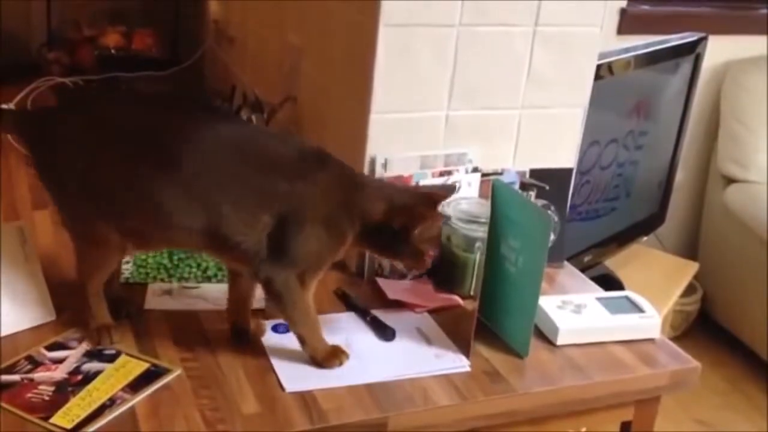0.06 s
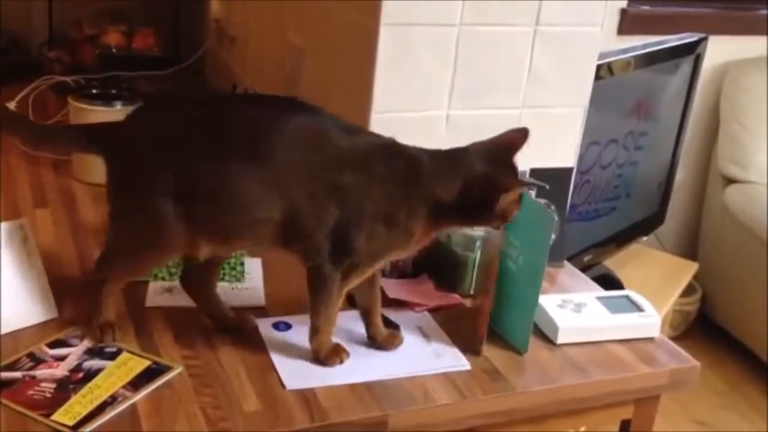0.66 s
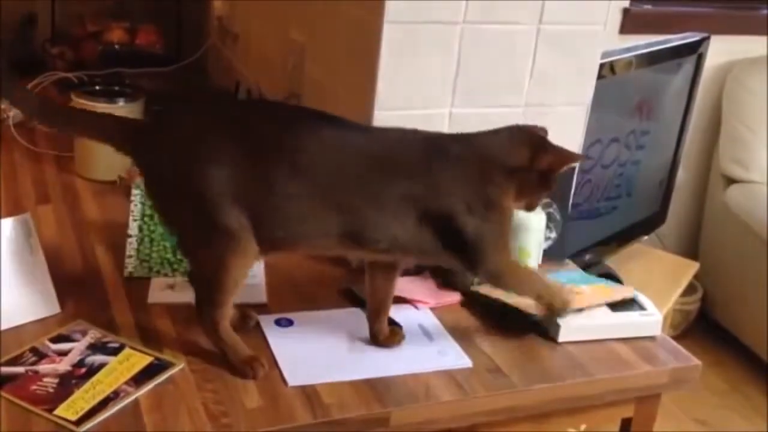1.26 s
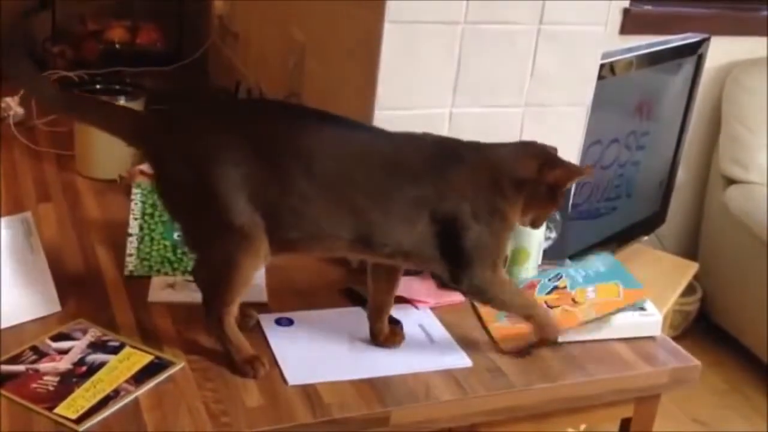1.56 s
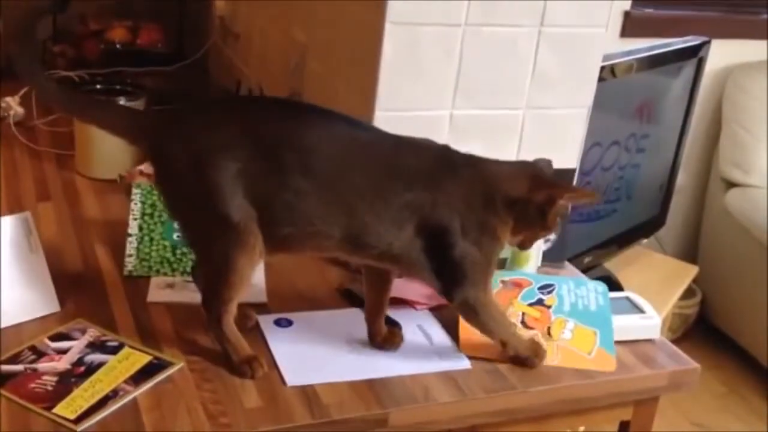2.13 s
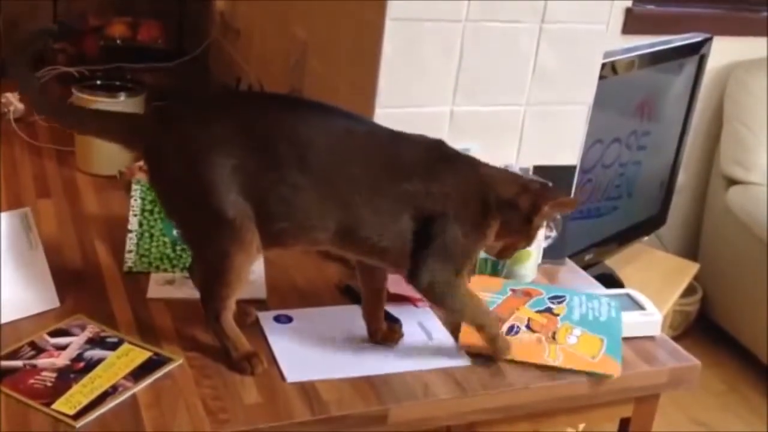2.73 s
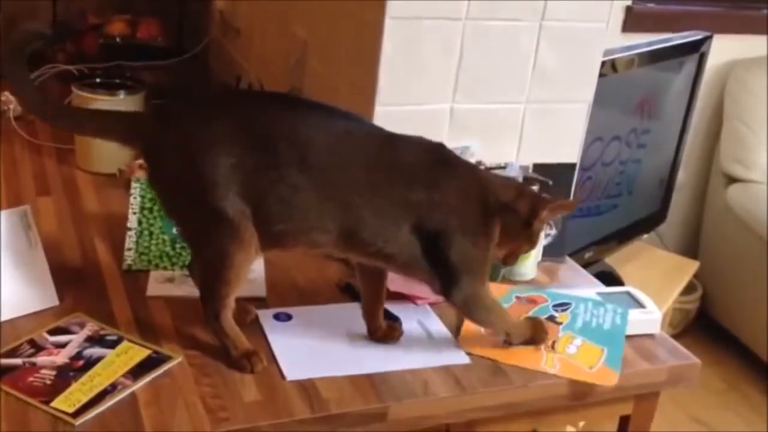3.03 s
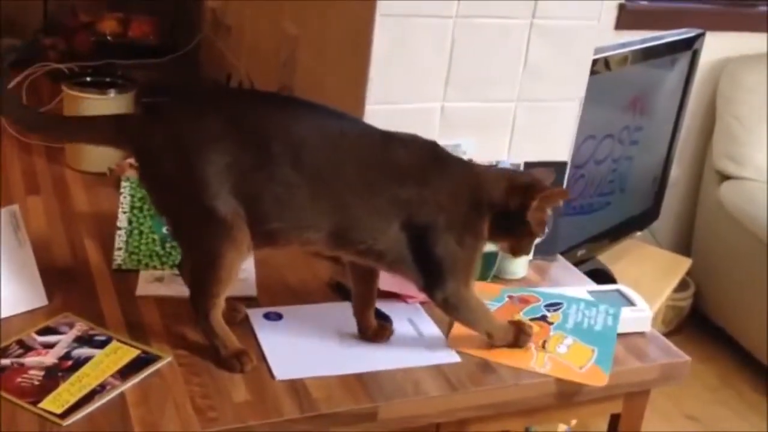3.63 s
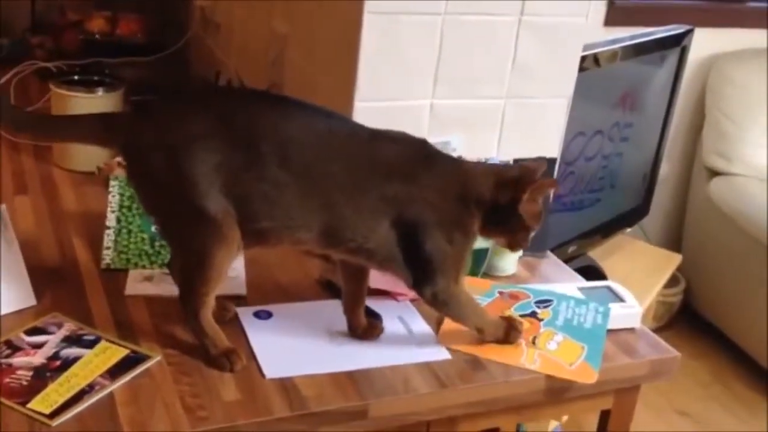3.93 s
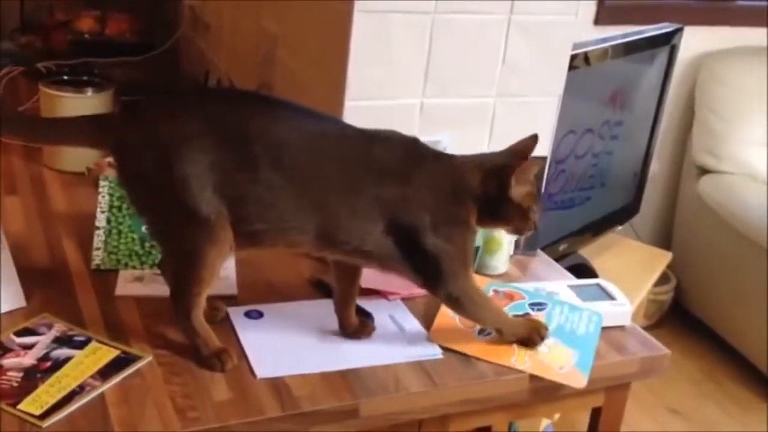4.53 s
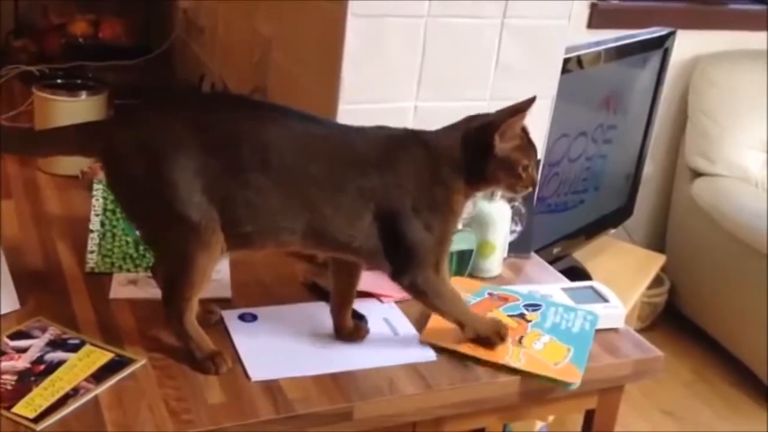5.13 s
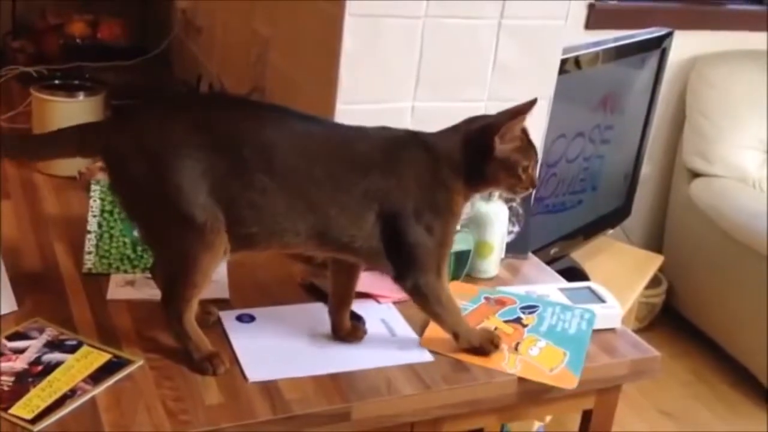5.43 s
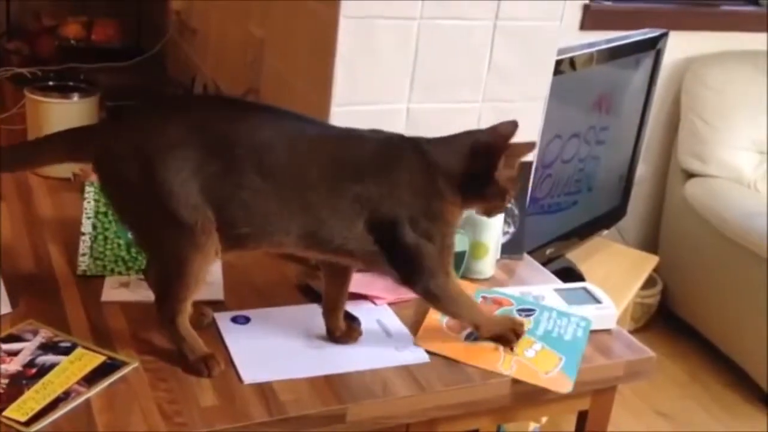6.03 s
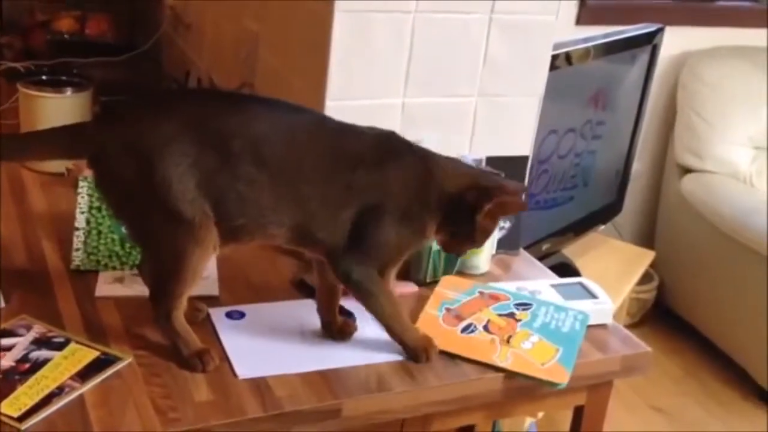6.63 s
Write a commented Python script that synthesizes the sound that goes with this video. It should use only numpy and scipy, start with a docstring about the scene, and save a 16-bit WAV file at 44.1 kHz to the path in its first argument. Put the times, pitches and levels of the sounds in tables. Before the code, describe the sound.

Stiff card clatters over, then snaps and scrapes in short bursts as a cat paws it across a table indoors.

```python
"""A stiff greeting card, tipped over by a cat, slaps onto a plastic box and is dragged about a wooden table.
Each impact gives a broadband crack and excites the damped modes of card or box; claws snag and flick
the edge, which twangs. Each push is a swell of stick-slip friction, filtered by the card's resonances.
Paws thud softly in the table's low modes. The small living room reverberates, and an appliance hums."""
import sys
import numpy as np
from scipy import signal
from scipy.fft import rfft, irfft
from scipy.io import wavfile

SR = 44100
rng = np.random.default_rng(int(sys.argv[2]) if len(sys.argv) > 2 else 0)


def unload_wav(signal):
    """Save mono or channel-first audio to the path in sys.argv[1] as 16-bit WAV at rate SR, clipped to [-1, 1]."""
    wavfile.write(
        sys.argv[1],
        SR,
        np.round(np.clip(np.atleast_2d(signal).T, -1, 1) * 32767).astype(np.int16),
    )


N = 303408
TIME = np.arange(N) / SR
TAIL = TIME[:SR // 2]   # time axis of one impact

# Levels are relative within a column; the functions add the gain of each layer and band.
# card strikes box: t/s, level/dB, bass/dB, treble/dB, contact decay/s, lid clack/dB, reverberation/dB,
# edge twang/dB
BOX_IMPACTS = [(1.309, -25.5, -24.5, -18.5, 0.0026, -5, 1.5, 10),
               (1.3659, -18.5, -30.5, -11, 0.0015, 17, -0.5, 4),
               (1.436, -33, -19.5, -17, 0.0035, 15.5, 3.5, 2)]
# claw flicks card: t/s, level/dB, bass/dB, treble/dB, catch interval/s, change per catch/dB, flexural f/Hz,
# after-ring/dB, edge f/Hz, edge twang/dB, claw tick/dB, reverberation/dB
CLAW_FLICKS = [(1.7082, -39, -22, -4, 0.0045, -4.5, 1940, 17, 3520, 14.5, 17, 4),
               (1.882, -40.5, -15.5, -5, 0.0094, -1, 1980, 16, 3770, 11, 4, 4.5),
               (1.9058, -35, -19, -9.5, 0.0052, -5.5, 2250, 11, 3700, 13, 6.5, -0.5),
               (2.474, -37.5, -20, -4, 0.0044, -12, 1580, 19, 4000, 11, 8, -2.5),
               (3.0637, -29.5, -33, -8.5, 0.0059, -1, 2140, 21, 3195, -6, 1.5, -0.5),
               (4.4878, -32.5, -34, -11.5, .005, 2, 2140, 16, 3100, 6.5, -0.5, 0),
               (5.353, -36, -27, -6, 0.0073, -1.5, 2210, 15.5, 3440, 6, -1, -1),
               (6.208, -30, -28, -8.5, .0019, -0.6, 2400, 19.5, 3153, 11.5, -3, -1)]
# card flops on table: t/s, level/dB, bass/dB, treble/dB, flexural f/Hz, claw tick/dB
CARD_DROPS = [(2.52, -39, -16, -10, 1530, 10), (2.5385, -40, -4.5, -8, 1510, 15),
              (2.5465, -39, -17.5, -4.5, 1590, 2), (3.093, -33, -16.5, -6, 1280, 8),
              (4.509, -34, -21, -9.5, 2200, -6), (5.371, -43.5, -10.5, -6, 2400, 3),
              (5.387, -38.5, -18.5, -6.5, 2160, 2)]
# card slides: t/s, duration/s, share spent accelerating, rub/dB, edge hiss/dB, first f/Hz, last f/Hz
PUSHES = [(0.816, 0.17, 0.22, -64.5, -61, 1800, 1900), (1.158, 0.12, 0.57, -65.5, -59, 1650, 1650),
          (1.262, 0.042, 0.38, -55.5, -57, 1850, 1850), (1.795, 0.16, 0.69, -55, -46, 2030, 1950),
          (2.177, 0.22, 0.26, -52, -51.5, 1150, 1830), (2.241, .045, 0.44, -46.5, -65, 1400, 1550),
          (2.471, 0.077, 0.73, -41.5, -40, 1640, 1490), (2.661, 0.12, .6, -47.5, -51, 1180, 1520),
          (2.758, 0.16, 0.3, -45, -45, 1560, 2350), (3.311, 0.093, 0.42, -50, -51, 1230, 1400),
          (3.44, 0.45, 0.45, -69.5, -95, 1740, 1800), (4.138, .1, 0.54, -52, -54.5, 1510, 1460),
          (4.336, 0.16, .6, -70.5, -65, 1800, 1800), (4.777, 0.15, 0.53, -51, -56.5, 1510, 1450),
          (4.883, 0.12, 0.39, -48.5, -50.5, 1360, 1420), (4.958, 0.23, 0.19, -51.5, -48.5, 1660, 1650),
          (5.499, 0.18, 0.38, -62, -73, 1800, 1810), (5.682, 0.12, 0.38, -58, -61, 1670, 1770),
          (5.82, 0.17, 0.51, -59.5, -62.5, 1760, 1820), (6.423, 0.21, 0.29, -66, -66.5, 1690, 1690),
          (6.813, 0.051, 0.3, -61.5, -54, 1840, 1780)]
# paw pats card: t/s, level/dB, treble/dB, flexural f/Hz
PAW_PATS = [(2.006, -48, -23, 1000), (2.105, -36.5, -24, 1990), (3.224, -47.5, -31, 1360),
            (3.469, -52, -35, 1400), (3.818, -47, -22, 1500), (3.966, -48, -41, 1330),
            (4.041, -50, -40, 1350), (5.201, -58.5, -2.5, 2040)]
# paw lands on table: t/s, level/dB, hardness/(dB per octave)
PAW_STEPS = [(1.512, -60, 0), (2.94, -62.5, -5), (5.855, -61.5, -4), (6.852, -56.5, -4)]
# short patches of faint, thin, high sizzle: t/s, duration/s, level/dB
HIGH_SIZZLE = [(0.52, 0.045, -77.5), (0.76, 0.31, -73.5), (1.18, .12, -69.5), (6.74, 0.18, -75)]
# claw ticks on paper: t/s, level/dB
CLAW_TICKS = [(1.2067, -54), (1.436, -39), (4.7625, -57.5), (6.4566, -57)]

# spectra of box slap, card snap, friction, claw tip, high sizzle and room noise: f/Hz, level/dB
SLAP_SPECTRUM = [(70, -56), (130, -29.5), (260, -21), (420, -23), (570, -24), (680, -8), (1180, -11),
                 (1450, -7), (1700, -1), (1990, 0), (2340, -5.5), (2750, -13), (4030, -7.5), (6500, -11.5),
                 (7500, -7), (10000, -20.5), (12800, -22.5), (14300, -23.5)]
SNAP_SPECTRUM = [(88, -52), (150, -21), (601, -21), (714, -4.5), (833, -8), (954, 0.5), (1110, 0.5),
                 (1200, 2.5), (1700, 2), (2140, 2.5), (2500, -2.5), (2810, -6.5), (3890, -1.5), (7600, -13),
                 (9270, -27.5), (15000, -37)]
FRICTION_SPECTRUM = [(290, -52), (500, -1.5), (571, -23), (707, 1.5), (775, -8.5), (898, 3.5), (1050, 2),
                     (1170, 7.5), (2190, 3.5), (2670, -6), (4610, -17.5), (7440, -28.5), (12000, -42),
                     (15600, -43), (22000, -120)]
CLAW_SPECTRUM = [(2000, -24), (4500, -20), (6000, -1), (7400, 5), (8400, -5), (9600, -14), (14000, -20),
                 (15000, -15)]
SIZZLE_SPECTRUM = [(2000, -24), (4500, -8), (6400, -9), (7200, 5.5), (8400, 0), (10000, -10), (12300, -13),
                   (13500, -1), (15000, -15)]
AIR_SPECTRUM = [(25, -17), (50, -23), (90, -19), (130, -11.5), (200, -4.5), (290, -10), (470, -10),
                (630, -17), (800, -14), (1140, -18.5), (1830, -17.5), (3070, -22), (4800, -21.5),
                (8000, -27.5), (10300, -34), (13500, -27.5), (15000, -29.5)]

# normal modes of the box, its lid, the card and the table: f/Hz, level/dB, T60/s
BOX_MODES = [(255, -9, .3), (313, -8, .3), (657, -6, .38), (728, -7, .35), (827, -9, .35), (947, -8, .36),
             (1462, -9, .35), (1674, 0, .33), (1730, -6, .3), (1815, 0, .32), (1906, 0, .33),
             (1975, -1, .3), (2061, 1, .3), (2216, -3, .28), (2295, -2, .28), (2404, -8, .25),
             (3594, -11, .3), (3980, -3.5, .33)]
LID_MODES = [(1820, -2.5, 0.023), (2010, 1, 0.019), (2270, -2, 0.034), (3260, -8, 0.014)]
CARD_MODES = [(660, -15, .35), (725, -7, .4), (952, -9, .3), (1184, -1, .35), (1228, -6, .28),
              (1351, -1, .35), (1460, -3, .3), (1500, -3, .28), (1600, -6, .3), (1775, -8, .3),
              (1904, -4, .28), (1942, -5, .28), (2024, -6, .25), (2092, -1, .25), (2140, 0, .25),
              (2223, -1, .25), (2340, -1, .27), (2410, -3, .26), (2490, -6, .22), (2640, -5, .3),
              (3158, -8, .17), (3800, -6, .28), (3865, -5, .3), (3950, -7, .25), (4294, -5, .24),
              (4400, -8, .25)]
TABLE_MODES = [(76, -11, 0.064), (104, -1.5, 0.12), (139, 5, 0.052), (218, 7.5, 0.059), (294, 8, 0.057)]
# partials of the flexed card and of its free edge: frequency ratio, level/dB
FLEX_PARTIALS = [(.6, -4), (1, 7.5), (1.52, -6.5), (1.9, -28)]
EDGE_PARTIALS = [(1, 1.5), (1.2, -9.5), (1.35, -5), (2.02, -9)]

# early reflections off the tiles and the screen: delay/s, level/dB
REFLECTIONS = [(.0043, -7), (0.0117, -13.5)]
# reverberation time of the room: f/Hz, T60/s
ROOM_T60 = [(200, 0.35), (800, 0.51), (1900, 0.55), (3600, 0.44), (9000, 0.35), (15000, 0.35)]
# tones of the appliance: f/Hz, level/dB, modulation depth
HUM_TONES = [(146.2, -73.5, 0.18), (192.2, -78.5, 0.48), (486, -81.5, 0.22), (784, -81, 0.02)]

EDGE_T60_S, CLAW_WET_DB = 0.018, 1   # decay of the edge's twang; reverberation of the claw's tick
CUTOFF_HZ = 15200


def card_on_box():
    """Impact excitation: the falling card slaps the hollow box, the lid clacks and the box rings on."""
    out = np.zeros(N)
    for s, db, bass, treble, decay_s, clack_db, wet_db, edge_db in BOX_IMPACTS:
        slap = crack(SLAP_SPECTRUM, decay_s, bass_db=bass + 24.5, middle_db=13.5, treble_db=treble + 24.5)
        slap += from_db(edge_db) * twang(EDGE_PARTIALS, hz=3950, t60=EDGE_T60_S)
        clack = from_db(clack_db) * band(ringing(LID_MODES), 1370, "high", order=3)
        impact = room(slap, wet_db) + room(clack, wet_db=-7.5)
        box_ring = from_db(15) * ringing(BOX_MODES, vary_db=3)
        add(out, s, from_db(db) * (impact + box_ring))
    return out


def card_flicks():
    """Plucking: the bent card slips off a claw in three catches, each bend setting a new pitch."""
    out = np.zeros(N)
    for s, db, bass, treble, gap_s, step_db, hz, ring_db, edge_hz, edge_db, claw_db, wet_db in CLAW_FLICKS:
        card, claw = np.zeros((2, len(TAIL)))
        for catch in range(3):
            bend = 1 + 0.035 * rng.uniform(-0.89, 1)
            edge = from_db(edge_db) * twang(EDGE_PARTIALS, edge_hz * bend, EDGE_T60_S)
            snap = card_snap(bass, treble, hz * bend, decay_s=0.002)
            add(card, catch * gap_s, from_db(catch * step_db) * (snap + edge))
            add(claw, catch * gap_s, from_db(catch * step_db + claw_db) * claw_tick())
        flick = room(card, wet_db) + room(claw, CLAW_WET_DB) + from_db(ring_db) * card_ring(treble)
        add(out, s, from_db(db) * flick)
    return out


def card_drops():
    """Impact on the table: the lifted card flops back, in a longer contact than a flick; a claw ticks."""
    out = np.zeros(N)
    for s, db, bass, treble, hz, claw_db in CARD_DROPS:
        flop = card_blow(bass, treble, hz, decay_s=0.0034, ring_db=15.5, wet_db=2)
        tick = room(from_db(claw_db) * claw_tick(), CLAW_WET_DB)
        add(out, s, from_db(db) * (flop + tick))
    return out


def card_blow(bass, treble, hz, decay_s, ring_db, wet_db):
    """Superposition: one blow is a reverberant snap plus the card's after-ring."""
    return room(card_snap(bass, treble, hz, decay_s), wet_db) + from_db(ring_db) * card_ring(treble)


def card_snap(bass, treble, hz, decay_s):
    """Transient response: a contact gives a crack and a brief flexural twang."""
    snap = crack(SNAP_SPECTRUM, decay_s, bass_db=bass + 22, middle_db=10, treble_db=treble + 20.5)
    return snap + from_db(11) * twang(FLEX_PARTIALS, hz, t60=0.019)


def card_ring(treble):
    """Free vibration of the card: a dull contact puts less energy into the high modes."""
    return ringing(CARD_MODES, vary_db=2, treble_db=treble + 10)


def twang(partials, hz, t60):
    """Flexural vibration, pitched by how the card is held; the twang carries little bass."""
    modes = [(hz * ratio, db, t60) for ratio, db in partials]
    return band(ringing(modes), 840, "high", order=2)


def card_slides():
    """Sliding friction: rub and edge hiss grow as powers of the speed, which varies in small jerks."""
    rub, hiss = friction()
    judder = from_db(0.9 * fluctuation(35))
    rub_power = hiss_power = 0
    for s, length_s, peak_share, rub_db, hiss_db, *_ in PUSHES:
        speed = push_speed(s, length_s, peak_share) * judder
        rub_power += (from_db(rub_db - 4) * speed ** 0.77) ** 2
        hiss_power += (from_db(hiss_db - 9.5) * speed ** 0.95) ** 2
    return rub * lingering_gain(rub_power) + hiss * lingering_gain(hiss_power)


def friction():
    """Stick-slip: fibres catch and release in clumps, driving the card's modes. Returns rub and hiss."""
    clumps = from_db(2 * fluctuation(64))
    slips = random_impulses(per_s=3500, spread_db=2) * clumps
    wash = from_db(0.5) * rng.standard_normal(N)   # slips blurred by the room
    drive = rms_one(slips + wash)
    rasp = rms_one(coloured(drive, FRICTION_SPECTRUM))
    body = rasp + from_db(1.5) * through(drive, ringing(CARD_MODES))
    # the pitch of the rub shifts as the card turns under the paw
    turns = sorted(point for s, length_s, *_, first_hz, last_hz in PUSHES
                   for point in [(s, first_hz), (s + length_s, last_hz)])
    hz = np.interp(TIME, *np.transpose(turns))
    tilt = hz / 1500
    low = rms_one(band(body, 1240, "low"))
    high = rms_one(band(body, [1500, 2700], "band"))
    rub = (low / tilt + high * tilt) / np.hypot(tilt, 1 / tilt)
    resonance = swept_resonance(random_impulses(per_s=1100, spread_db=2), hz, width_hz=550)
    hiss = rms_one(band(rasp, 3500, "high")) * tilt
    return rms_one(rub + from_db(-4.5) * resonance), hiss


def push_speed(start_s, length_s, peak_share):
    """Motion under one push: the card accelerates from rest to unit speed and slows to rest."""
    peak_s = start_s + length_s * peak_share
    return np.sin(np.pi / 2 * np.interp(TIME, [start_s, peak_s, start_s + length_s], [0, 1, 0]))


def claw_tick():
    """Hard contact: a small claw tip gives a short click, mostly treble."""
    return energy_one(coloured(contact(decay_s=0.0017), CLAW_SPECTRUM))


def paw_pats():
    """Light impacts on the flat card: a soft pad excites little treble, a claw more."""
    out = np.zeros(N)
    for s, db, treble, hz in PAW_PATS:
        pat = card_blow(bass=-32, treble=treble, hz=hz, decay_s=0.0025, ring_db=11, wet_db=-1.5)
        add(out, s, from_db(db + 2.5) * pat)
    return out


def paw_thuds():
    """Compliant contact: pads excite only the table's low modes; the softer the step, the deeper."""
    out = np.zeros(N)
    lowest_hz = TABLE_MODES[0][0]
    for s, db, hardness in PAW_STEPS:
        modes = [(hz, level + hardness * np.log2(hz / lowest_hz), t60) for hz, level, t60 in TABLE_MODES]
        add(out, s, from_db(db + 29.5) * ringing(modes))
    return out


def sizzle_and_ticks(fade_s=0.065):
    """Filtered impulses: a faint, thin, high sizzle comes in short patches, and claws tick on the paper."""
    patches = 0
    for s, length_s, db in HIGH_SIZZLE:
        corners_s = [s - fade_s, s, s + length_s, s + length_s + fade_s]
        patches += from_db(db + 8.5) * np.interp(TIME, corners_s, [0, 1, 1, 0])
    clicks = patches * random_impulses(per_s=450, spread_db=1)
    for s, db in CLAW_TICKS:
        add(clicks, s, from_db(db + 22) * energy_one(contact(decay_s=0.0029)))
    return coloured(clicks, SIZZLE_SPECTRUM)


def ringing(modes, vary_db=0.0, treble_db=0.0):
    """Modal superposition: damped sines whose strengths vary with the spot struck; unit energy."""
    hz, db, t60 = np.transpose(modes)[:, :, None]
    db = db + vary_db * rng.standard_normal(db.shape) + treble_db * np.clip(np.log2(hz / 2200), 0, 1)
    strength = from_db(db) * rng.choice([-1, 1], db.shape)
    decay = from_db(-60 * TAIL / t60)
    return energy_one(np.sum(strength * decay * np.sin(2 * np.pi * hz * TAIL), axis=0))


def crack(spectrum, decay_s, bass_db, middle_db, treble_db):
    """Impact noise: its energy in three bands makes it dull or bright, by where the contact lands."""
    noise = coloured(contact(decay_s), spectrum)
    low = from_db(bass_db) * energy_one(band(noise, [130, 500], "band", order=3))
    middle = from_db(middle_db) * energy_one(band(noise, [550, 2700], "band"))
    high = from_db(treble_db) * energy_one(band(noise, 2750, "high"))
    return low + middle + high


def contact(decay_s, rise_s=0.00092):
    """Broadband excitation: a quickly dying noise burst with a nearly flat spectrum."""
    envelope = np.exp(-TAIL / decay_s) * (1 - np.exp(-TAIL / rise_s))
    phase = np.angle(rfft(rng.standard_normal(len(TAIL)) * envelope))
    return irfft(np.exp(1j * phase), len(TAIL)) * np.sqrt(envelope)


def random_impulses(per_s, spread_db):
    """Poisson process: impulses of uneven size at random instants; unit rms."""
    sizes = from_db(spread_db * np.minimum(rng.exponential(1, N), 4))
    return rms_one((rng.random(N) < per_s / SR) * sizes * rng.choice([-1, 1], N))


def room(x, wet_db, build_s=0.002):
    """Reverberation: direct sound, two reflections and a diffuse tail, new for each spot on the table."""
    hz = np.fft.rfftfreq(len(TAIL), 1 / SR)
    white = rfft(rng.standard_normal(len(TAIL)))
    edges_hz = np.geomspace(100, 18000, 9)
    tail = 0
    for low, high in zip(edges_hz, edges_hz[1:]):
        centre = np.sqrt(low * high)
        noise = irfft(white * ((hz >= low) & (hz < high)), len(TAIL))
        envelope = from_db(-60 * TAIL / at_hz(ROOM_T60, centre)) * (1 - np.exp(-TAIL / build_s))
        unabsorbed = from_db(-5.5 * centre / CUTOFF_HZ)   # soft furniture soaks up the treble
        tail += unabsorbed * np.sqrt(2 * (high - low) / SR) * energy_one(noise * envelope)
    response = from_db(wet_db) * tail
    response[0] += 1
    for delay_s, db in REFLECTIONS:
        response[int(delay_s * SR * rng.uniform(.85, 1.15))] += from_db(db)
    return through(x, response)


def lingering_gain(power, share=0.34, t60=0.55):
    """Energy storage: the room releases a share of the power exponentially. Returns an amplitude."""
    retained = 10 ** (-6 / (t60 * SR))
    stored = signal.lfilter([1 - retained], [1, -retained], power + 1e-18)
    return np.sqrt((1 - share) * power + share * stored)


def room_hiss():
    """Stationary noise: the steady, coloured hiss of the room."""
    return from_db(-67) * rms_one(coloured(rng.standard_normal(N), AIR_SPECTRUM))


def appliance_hum():
    """Random modulation: each tone of the appliance wavers slowly in amplitude and phase."""
    hum = 0
    for hz, db, depth in HUM_TONES:
        swell, sway = fluctuation(6.8), fluctuation(6.8)
        tone = np.sqrt(2) * np.sin(2 * np.pi * hz * TIME + depth * sway)
        hum += from_db(db + 1.5) * (1 + depth * swell) * tone
    return hum


def fluctuation(cutoff_hz):
    """Low-pass noise of unit rms."""
    return rms_one(band(rng.standard_normal(N), cutoff_hz, "low", order=2))


def swept_resonance(x, hz, width_hz):
    """Heterodyne filtering: a pass band whose centre follows a pitch curve; unit rms."""
    carrier = np.exp(2j * np.pi * np.cumsum(hz) / SR)
    return rms_one((band(x / carrier, width_hz / 2, "low", order=2) * carrier).real)


def coloured(x, spectrum, size=4096):
    """Minimum-phase filtering: folding the cepstrum gives a causal response with this spectrum."""
    cepstrum = irfft(np.log(from_db(at_hz(spectrum, np.fft.rfftfreq(size, 1 / SR)))))
    cepstrum[1:size // 2] *= 2
    cepstrum[size // 2 + 1:] = 0
    return through(x, irfft(np.exp(rfft(cepstrum))))


def at_hz(points, hz):
    """Interpolation on a log-frequency axis."""
    known_hz, values = np.transpose(points)
    return np.interp(np.log(np.maximum(hz, 1)), np.log(known_hz), values)


def band(x, edges_hz, kind, order=4):
    return signal.sosfilt(signal.butter(order, edges_hz, kind, fs=SR, output="sos"), x)


def through(x, response):
    return signal.fftconvolve(x, response)[:len(x)]


def add(track, s, sound):
    start = int(s * SR)
    track[start:start + len(sound)] += sound[:len(track) - start]


def from_db(db):
    return 10 ** (np.asarray(db) / 20)


def rms_one(x):
    return x / np.sqrt(np.mean(x ** 2) + 1e-20)


def energy_one(x):
    return x / np.sqrt(np.sum(x ** 2) + 1e-20)


def scene():
    """Linear superposition: the pressures of all sources add in one channel."""
    foreground = (card_on_box() + card_slides() + paw_thuds() + sizzle_and_ticks()
                  + card_flicks() + card_drops() + paw_pats())
    return (foreground + room_hiss() + appliance_hum())[None]


def record(dry):
    """Band limiting: the small microphone loses the deep bass, and the top is cut steeply."""
    thin = band(dry, 75, "high", order=2)
    return signal.sosfilt(signal.ellip(10, .1, 80, CUTOFF_HZ, fs=SR, output="sos"), thin)


dry = scene()
out = record(dry)
unload_wav(out)
```